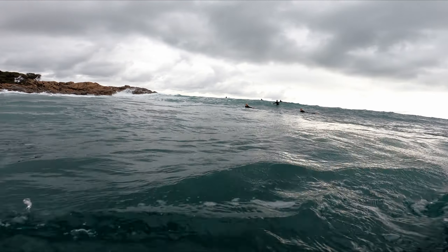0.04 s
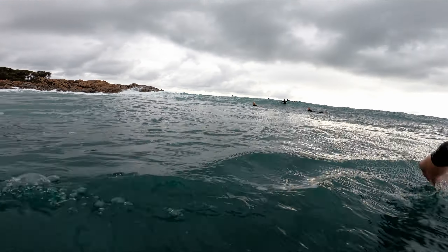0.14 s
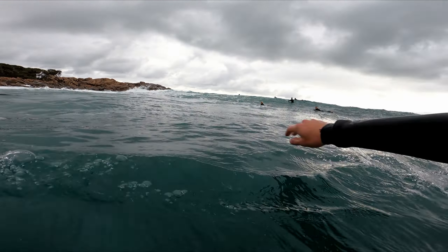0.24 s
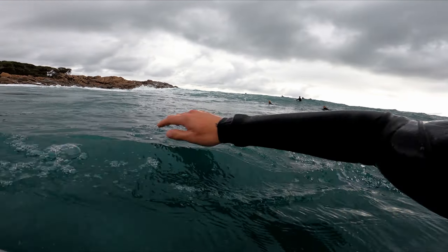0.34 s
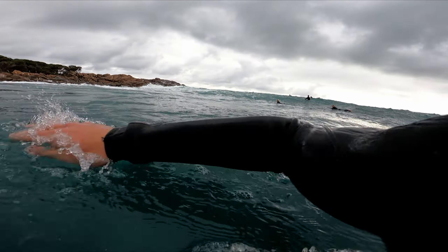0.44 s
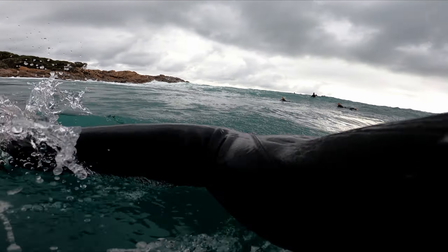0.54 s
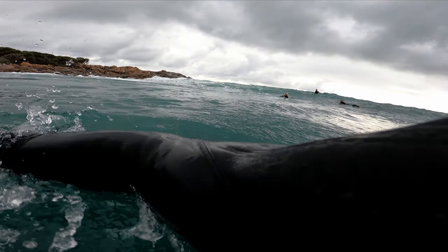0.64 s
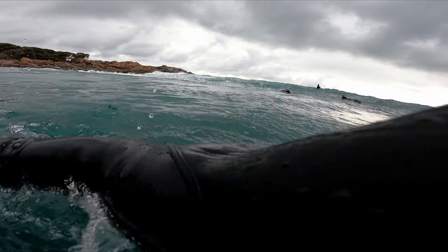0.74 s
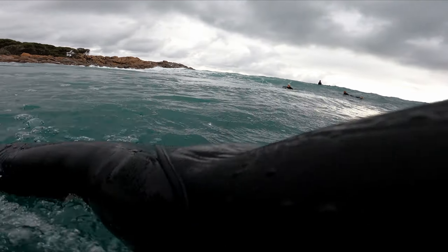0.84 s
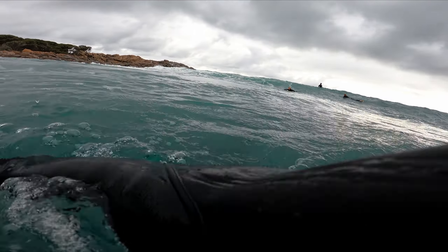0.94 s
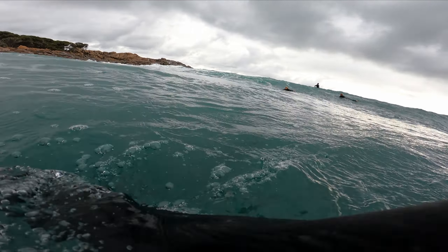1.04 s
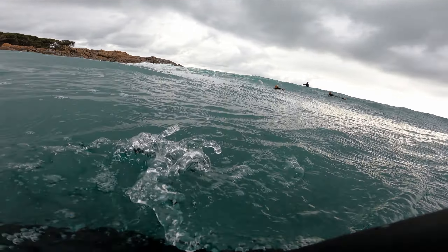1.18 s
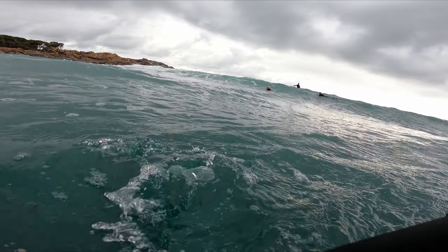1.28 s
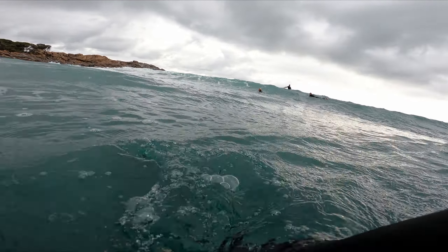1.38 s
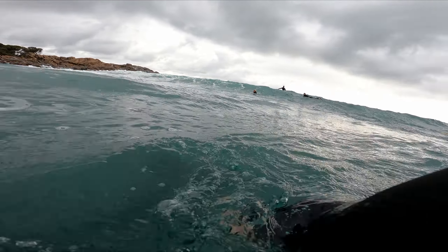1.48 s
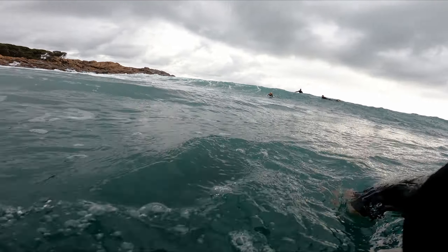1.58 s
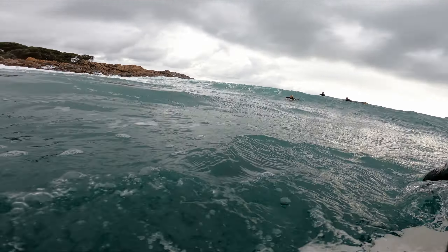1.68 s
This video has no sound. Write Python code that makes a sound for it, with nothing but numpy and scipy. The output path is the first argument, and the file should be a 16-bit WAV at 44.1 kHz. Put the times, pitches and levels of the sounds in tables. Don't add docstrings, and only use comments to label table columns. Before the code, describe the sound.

A small camera at choppy sea level: water gulps, knocks and sloshes against its covered microphone while spray hisses, drops tick, and wind rumbles low.

```python
import sys
import numpy as np
from scipy import signal
from scipy.fft import rfft, irfft, next_fast_len
from scipy.io import wavfile
from scipy.ndimage import uniform_filter1d, minimum_filter1d, map_coordinates

SR = 44100
rng = np.random.default_rng(int(sys.argv[2]) if len(sys.argv) > 2 else 0)


def convert_level_to_amplitude(level_db):
    exponent = np.asarray(level_db, float) / 20
    return 10 ** exponent


def unload_audio(sound):
    columns = np.transpose(np.atleast_2d(sound))
    steps = np.round(np.clip(columns, -1, 1) * 32767)
    wavfile.write(sys.argv[1], SR, steps.astype(np.int16))


N = 266805

# t/s, peak level/dB, f/Hz
SNAPS = [(0.167, -17.5, 1050), (0.204, -10.5, 1030), (0.226, -16, 1264), (0.252, -13.5, 1056),
         (0.59, -8.5, 1260), (0.74, -8.5, 1055), (0.786, -17.5, 1136), (0.82, -11.5, 1060),
         (.839, -12.5, 1050), (0.861, -8, 1213), (.885, -7.5, 1250), (0.9, -10.5, 1300), (0.601, -11, 1090),
         (2.044, -12, 1150), (2.133, -12.5, 1006), (2.147, -15.5, 950), (2.163, -16, 950),
         (2.178, -15, 1008), (2.562, -11.5, 1050), (2.628, -17.5, 1050), (3.645, -21, 1050),
         (4.206, -17, 950), (4.238, -22.5, 976), (4.636, -16.5, 1050), (0.951, -9, 1170),
         (0.9645, -7.5, 1180), (0.976, -7.5, 1190), (1.13, -14.5, 1120), (1.172, -10.5, 1160),
         (1.272, -13.5, 960), (1.303, -24, 1067), (1.418, -10, 1153), (1.456, -6.5, 1170),
         (1.546, -18, 940), (1.89, -10, 1050), (2.269, -17.5, 1070), (2.331, -19.5, 923),
         (2.526, -12.5, 1050), (2.67, -19, 873), (2.975, -12.5, 1048), (3.09, -18, 1110),
         (3.549, -14.5, 1120), (4.072, -11, 1095), (4.113, -21.5, 953), (4.19, -23, 920), (4.269, -18, 890),
         (4.297, -17, 1050), (4.323, -14.5, 1050), (4.34, -20.5, 897), (4.675, -12.5, 1110),
         (4.728, -15.5, 906), (4.777, -14.5, 873), (5.054, -20.5, 972), (5.273, -12, 1065),
         (5.705, -13, 1120)]
# t/s, graininess, sharpness/dB
COARSE = [(0, 0.34, -3.5), (.9, 0.56, 2), (1.3, 0.61, 0), (1.9, 0.77, -2), (2.3, 0.45, 0.5),
          (2.8, 0.36, -4), (3.5, 0.58, 1), (4.2, 0.53, -5.5), (4.9, 0.14, -3.5), (5.4, 0.32, -2),
          (6.05, 0.096, 1.5)]
# f/Hz, level/dB
CLEAR = [(100, -15), (300, 2), (800, -4), (1800, -7.5), (2600, -6), (3300, -2), (3850, 2.5), (4900, -6),
         (6300, -12), (7400, -21.5), (8400, -36), (9900, -55.5), (11800, -48.5), (13300, -61)]


def film():
    slosh_db, froth_db, rattle_db = stirring()
    tremble = wobble(140)
    pockets = air_pockets(tremble)
    ringing = filtered(pockets, lambda hz: hz > 650)

    churn = convert_level_to_amplitude(slosh_db + 4.0) * slosh() + (convert_level_to_amplitude(froth_db - 2.5) + convert_level_to_amplitude(-55)) * froth()
    churn = convert_level_to_amplitude(1.86 * wobble(25)) * pushed_aside(pockets - ringing, 2.1) * churn

    snap_s = np.transpose(SNAPS)[0]
    rattle_db = rattle_db - humps(snap_s - .001, rise=0.0084, fall=0.0026, db=6)
    unsteady_db = (0.94 + 2.4 * curves(COARSE)[0]) * wobble(40)
    shaking = convert_level_to_amplitude(rattle_db + 5.0 + unsteady_db) * pushed_aside(ringing, 14) * rattle()
    shaking = filtered(shaking, lambda hz: 1 / (1 + (hz / 2200) ** 8))
    return filtered(churn, wet_port) + shaking + pockets


def air_pockets(tremble):
    # t/s, start f/Hz, end f/Hz, length/s, peak level/dB
    gulps = [(.01, 125.7, 114.7, 0.014, -7), (0.051, 177.3, 132.5, 0.017, -10.5),
             (0.683, 902, 705, 0.031, -24.5), (0.834, 465, 312, 0.043, -18.5),
             (0.838, 230, 113.6, 0.095, -10.5), (.705, 957, 675, .025, -24.5),
             (1.003, 148, 133, 0.045, -16.5), (.15, 297, 216, 0.071, -23.5), (2.93, 350, 217, 0.019, -20),
             (4.2, 1028, 397, 0.021, -28), (4.64, 200, 149.5, 0.03, -11.5), (4.725, 297, 235, 0.016, -20),
             (5.035, 401, 190.4, 0.021, -15.5), (5.675, 288, 154, 0.049, -20),
             (0.611, 293, 255.4, 0.11, -24), (.955, 139.3, 169, 0.051, -14.5),
             (1.595, 289, 169, 0.069, -23.5), (2.02, 189.8, 149.7, 0.059, -13),
             (2.133, 184, 156, 0.016, -9.5), (2.174, 155, 154, 0.031, -12), (2.889, 485, 265, 0.04, -13.5),
             (4.139, 376, 1236, 0.032, -22.5), (3.722, 313, 164.3, .07, -17.5),
             (3.829, 251, 195, 0.025, -15), (4.005, 284, 200, 0.089, -19), (4.193, 264, 163, 0.046, -12.5),
             (4.273, 665, 388, 0.035, -22.5), (5.937, 78.6, 65.9, 0.056, -14)]
    # t/s, start f/Hz, end f/Hz, length/s, peak level/dB
    bloops = [(1.395, 433, 632, 0.019, -26), (1.492, 266, 650, 0.033, -16), (1.53, 222.6, 650, 0.036, -19),
              (1.857, 1546, 1695, 0.011, -12), (1.896, 1079, 1143, 0.036, -29.5),
              (3.733, 950, 1430, .025, -27.5), (3.745, 930, 990, .025, -30), (4.01, 955, 1100, 0.034, -34),
              (4.262, 385, 647, 0.02, -23), (5.305, 140, 265, 0.045, -17), (5.35, 864, 918, 0.02, -25.5),
              (1.933, 1920, 2070, 0.0091, -2), (2.806, 200, 217, 0.052, -14.5),
              (2.857, 273, 572, 0.031, -18.5), (3.189, 278.5, 357, 0.061, -18),
              (3.604, 163, 274, 0.034, -17.5), (3.651, 265.6, 312, 0.03, -14.5),
              (3.707, 845, 1020, .05, -25), (3.944, 164.2, 202.5, 0.14, -18),
              (4.113, 181, 1664, 0.04, -23.5), (4.36, 137.5, 169.4, 0.15, -21),
              (4.598, 185.5, 206, 0.028, -16.5), (4.818, 186, 184, 0.036, -16),
              (5.024, 240, 431, 0.022, -21.5), (5.088, 173, 199.4, 0.041, -16.5),
              (5.477, 177, 520, .06, -20.5), (5.568, 150.6, 187, 0.012, -12),
              (5.86, 174.6, 228, .045, -20.5)]
    # t/s, start f/Hz, end f/Hz, length/s, peak level/dB
    flutters = [
        (2.0397, 117.6, 110.5, 0.135, -25.5),
        (5.451, 146, 134, 0.26, -36.5),
    ]

    pockets = bubbles(*np.transpose(gulps), overtone=0.11, attack=0.2, settle=0.91)
    pockets = pockets + bubbles(*np.transpose(bloops), overtone=0.26, attack=0.082, settle=0.13)
    s, db, hz = np.transpose(SNAPS)
    pockets = pockets + bubbles(s, 1.415 * hz, hz, 1.7 / hz, db - 3.5, overtone=.3, attack=0.044)
    pockets = pockets + bubbles(s, 0.4 * hz, 0.7 * hz, 2.0 / hz, db - 13, overtone=0, attack=0.099)
    pockets = pockets * convert_level_to_amplitude(1.5 * tremble)

    flaps = -bubbles(*np.transpose(flutters), overtone=0.97, attack=0.24, count=16)
    flaps = coloured(flaps, [(200, 3.5), (500, -20.0), (1000, -13.0), (2200, 9.0)])
    buzzing = coloured(buzz(tremble), [(200, -0.5), (500, -14.0), (950, -7), (1300, -10.5), (2200, 2.5)])
    return filtered(pockets + flaps + buzzing, wet_port)


def buzz(tremble, overtone=0.91, rough=0.006, count=13):
    # t/s, f/Hz, level/dB
    beats = [
        (1.578, 425.2, -59.5),
        (1.586, 366.6, -22),
        (1.6, 286, -24),
        (1.63, 225.8, -26),
        (1.664, 176.5, -21.5),
        (1.698, 214.2, -23.5),
        (1.731, 167.7, -25),
        (1.748, 172, -56),
    ]
    hz, db = curves(beats)
    uneven_hz = uniform_filter1d(hz, size=600) * (1 + rough * tremble)
    turn = 2 * np.pi * np.cumsum(uneven_hz) / SR
    tone = sum(overtone ** n * np.sin((n + 1) * turn) for n in range(count))
    return -convert_level_to_amplitude(db + 40 * rough * tremble) * (db > -55) * tone


def slosh():
    # f/Hz, level/dB
    rush = [(70, -22), (125, -2.5), (180, -3.5), (280, -7), (380, -16), (600, -24.5)]
    flaps = swarm(count=420, mid_hz=200, spread=0.338, cycles=4.99, glide=0.377, scatter_db=0.0, overtone=0.28)
    return unit(0.48 * flaps + 0.83 * unit(coloured(patchy(3.45), rush)))


def froth():
    # f/Hz, level/dB
    fine = [(250, -16.5), (400, -1), (650, -10.5), (1000, -29)]
    beads = swarm(count=700, mid_hz=520, spread=.22, cycles=5.3, glide=.3, scatter_db=3.5, overtone=0)
    return unit(0.66 * beads + 0.89 * unit(coloured(patchy(0.81), fine)))


def rattle():
    # f/Hz, level/dB
    shake = [(400, -39), (750, -22), (950, 7), (1400, 9), (3000, 2.5), (6000, -10), (9000, -30)]
    # t/s, ring f/Hz
    ring = [(0.0, 1038), (0.74, 1050), (1.14, 1120), (1.68, 1003), (1.94, 1158), (2.19, 980), (2.24, 1073),
            (2.81, 1028), (2.85, 1093), (3.2, 1040), (4.87, 1027), (5.15, 1176), (5.37, 882), (5.41, 1093),
            (5.59, 993), (5.68, 1150), (5.9, 1103), (6.05, 1174)]
    low_hz, high_hz = 950, 1170
    patter = swarm(count=1800, mid_hz=1050, spread=0.27, cycles=8.8, glide=0.19, scatter_db=-3.0, overtone=0)
    hiss = coloured(patchy(2.8, bins=2.6, frames=2.8), shake)
    shaken = 0.65 * patter + 3.4 * unit(hiss)
    low_ring = unit(filtered(shaken, lambda hz: wet_port(hz, low_hz, sharp=2.19)))
    high_ring = unit(filtered(shaken, lambda hz: wet_port(hz, high_hz, sharp=2.19)))
    high = np.clip((curves(ring)[0] - low_hz) / (high_hz - low_hz), 0, 1)
    return unit((1 - high) * low_ring + high * high_ring)


def wet_port(hz, ring_hz=1060, sharp=2.4):
    return (1 - (hz / ring_hz) ** 2 + 1j * hz / (ring_hz * sharp)) ** -2


def stirring():
    # t/s, level/dB
    stir = [(0, -32), (.8, -30.5), (1.1, -32.5), (1.5, -29), (2, -29), (2.15, -26.5), (2.35, -31),
            (2.68, -30.5), (2.86, -21.5), (3.05, -33.5), (3.3, -27.5), (3.5, -30.5), (3.72, -21.5),
            (3.9, -27.5), (4.3, -27.5), (4.8, -29), (6.05, -28)]
    # t/s, fade/s, churn level/dB, rattle level/dB
    surges = [(.02, 0.038, 8.5, 0), (.17, 0.1, 4.5, -1.5), (0.697, 0.057, -1, 10.5), (0.82, 0.054, 4.5, 6),
              (.88, 0.044, 1.5, 7.5), (.93, 0.046, 6, 3.5), (.98, 0.016, 2.5, 1.5), (1.041, 0.036, 3, 2.5),
              (1.32, 0.098, -7, 4), (1.59, 0.043, 8, 6), (1.67, 0.12, -5, -5), (1.79, 0.049, -2.5, -5.5),
              (2.28, .04, -10.5, 4), (3.19, 0.04, -2, 9.5), (3.47, 0.031, -5, 4), (4.93, 0.13, -4, 3.5),
              (5.66, 0.29, -4, -0.5), (2.63, 0.05, 5, 2.5), (2.02, 0.039, 5, 2.5), (2.09, 0.18, 2, 3),
              (2.9, 0.036, 7.5, 12), (3.224, 0.045, 8.5, -0.5), (3.331, 0.082, 10, 1.5),
              (3.57, 0.16, 7.5, 2), (3.74, 0.018, -7.5, 4), (4.031, 0.04, 3, 7), (4.13, 0.038, 2, 7.5),
              (4.16, 0.025, -6, 10), (4.461, 0.15, 2.5, -5), (4.6, 0.024, -0.5, 3.5),
              (4.649, 0.021, 8, 1.5), (5.9, 0.11, -2, 0), (5.09, 0.023, 9, -6.5), (5.34, 0.06, 5, 3),
              (5.483, 0.13, 8.5, 7)]
    # t/s, settling/s, return/s, depth/dB
    lulls = [(1.009, 0.036, 0.025, 12), (1.576, 0.18, 0.023, 10), (2.07, 0.016, 0.087, 3),
             (2.199, 0.019, 0.12, 16), (2.929, 0.032, 0.055, 14), (2.999, 0.071, 0.18, 20.5),
             (3.37, 0.056, 0.029, 8.5), (3.522, 0.038, 0.081, 11), (3.84, 0.089, 0.18, 12),
             (4.082, 0.026, 0.04, 17.5), (4.18, 0.018, 0.0095, 27), (4.38, 0.11, .08, 6),
             (.23, 0.022, 0.05, 2.5)]
    stir_db = curves(stir)[0]
    above_calm_db = stir_db + 26.5
    s, fade, churn_db, ring_db = np.transpose(surges)
    slap_s = 0.051
    churn = humps(s, slap_s, fade, churn_db)
    ring = humps(s, slap_s, fade, ring_db)
    still = humps(*np.transpose(lulls))
    slosh_db = stir_db + churn - 0.7 * still
    froth_db = -34 + 0.13 * above_calm_db + churn - 0.93 * still
    rattle_db = -28 + 0.69 * above_calm_db + ring - still
    return slosh_db, froth_db, rattle_db


def spray():
    grain, sharp_db = curves(COARSE)
    hiss = fizz(grain)
    pings = drops(hiss)
    level = convert_level_to_amplitude(foaming() + 6.0) * pushed_aside(pings, 2.0)
    return level * foam(hiss, grain, sharp_db) + pings + ticks()


def fizz(grain):
    keep = np.exp(-1 / (0.0043 * SR))
    bursts = unit(signal.lfilter([1], [1, -keep], convert_level_to_amplitude(4.85 * grain * wobble(260))))
    return bursts * patchy(2.1, bins=10, frames=3)


def foam(hiss, grain, sharp_db):
    crackle = swarm(count=1500, mid_hz=3700, spread=0.24, cycles=5.8, glide=0.2, scatter_db=3.0, overtone=0)
    spatter = swarm(count=700, mid_hz=6460, spread=0.15, cycles=2.9, glide=0.089, scatter_db=1.5, overtone=0.3)
    clumps = convert_level_to_amplitude(1.8 * wobble(21.62))
    mix = coloured(hiss + grain * clumps * (0.53 * crackle + 0.36 * spatter), CLEAR)
    mix = mix / np.sqrt(np.abs(uniform_filter1d(mix ** 2, SR // 4)))
    top = filtered(mix, lambda hz: 1 / (1 + (5200 / (hz + 1)) ** 8))
    return mix + (convert_level_to_amplitude(sharp_db) - 1) * top


def drops(hiss):
    # t/s, peak level/dB, f/Hz
    bursting = [(0.122, -26, 3780), (0.153, -20.5, 3470), (0.2294, -25, 3370), (0.302, -16, 2980),
                (0.3087, -25, 3570), (0.366, -14.5, 3590), (0.3719, -16, 3690), (0.3935, -20, 3720),
                (0.434, -20, 4250), (0.4832, -24, 3550), (0.5477, -33, 3500), (0.566, -29, 3950),
                (0.5782, -29, 3680), (0.6337, -34.5, 3760), (0.673, -21, 3970), (0.737, -20, 4530),
                (0.787, -28.5, 3150), (0.81, -20.5, 4860), (0.817, -28, 3040), (1.105, -28.5, 3530),
                (1.1258, -26, 3370), (1.2028, -19, 4270), (1.2084, -22, 4100), (1.338, -19, 4090),
                (1.3583, -22.5, 3800), (1.3832, -19.5, 3950), (1.4375, -18.5, 4090), (1.501, -29, 4000),
                (1.5318, -28, 4140), (1.786, -26.5, 3030), (1.853, -25, 3960), (1.875, -23.5, 3960),
                (1.924, -20.5, 4330), (1.935, -24.5, 4220), (1.968, -29, 4070), (1.9823, -18.5, 3800),
                (2.059, -25, 4000), (2.2633, -23.5, 3750), (2.323, -22, 2710), (2.397, -17.5, 3890),
                (2.4388, -17, 3930), (2.452, -14, 4190), (2.555, -19.5, 4140), (2.593, -22, 4190),
                (2.61, -21, 3400), (2.695, -33, 4150), (2.7488, -24, 3450), (2.815, -31.5, 4070),
                (3.002, -31.5, 3890), (3.027, -28, 4180), (3.058, -28, 3920), (3.0945, -23, 3740),
                (3.1392, -22.5, 3740), (3.649, -22.5, 4070), (3.933, -25, 3630), (4.3818, -26.5, 3920),
                (4.484, -15.5, 4160), (4.7788, -21.5, 4100), (4.8317, -23.5, 4210), (5.154, -22, 3700)]
    s, db, hz = np.transpose(bursting)
    pings = bubbles(s, hz, 1.037 * hz, 16 / hz, db + 0.5, overtone=0, attack=0.06)
    return filtered(pings * (1 + 1.3 * hiss), lambda f: 1 / (1 + (f / 6000) ** 14))


def ticks():
    # t/s, peak level/dB
    hits = [(0.201, -46), (0.295, -41), (0.4374, -26), (0.6685, -36), (0.7156, -32.5), (0.7384, -34),
            (0.8784, -38), (0.896, -34), (1.146, -37), (1.226, -36), (1.2382, -28), (1.4448, -29),
            (1.717, -50.5), (1.856, -28), (1.8781, -34.5), (1.925, -30.5), (1.9994, -35), (2.0596, -45.5),
            (2.2621, -27.5), (2.2963, -30), (2.3496, -28.5), (2.379, -44), (2.4046, -25.5), (2.4368, -37.5),
            (2.4433, -28.5), (2.808, -40), (3.093, -38), (3.5252, -32.5), (3.5376, -29), (3.93, -37),
            (4.3793, -43), (4.4787, -47), (4.776, -34.5), (5.2062, -42), (5.2167, -30), (5.8494, -40)]
    s, db = np.transpose(hits)
    strikes = np.zeros(N)
    strikes[np.round((s + .001) * SR).astype(int)] = convert_level_to_amplitude(db + 21.0)
    fade = convert_level_to_amplitude(-60 * np.arange(400) / SR / 0.012)
    noise = np.convolve(strikes, fade)[:N] * rng.standard_normal(N)
    return coloured(coloured(noise, CLEAR), [(2000, -23.5), (6000, 6), (7200, 5), (9000, -1.5), (11500, 7)])


def foaming():
    # t/s, level/dB
    foam_level = [(0, -45.5), (.12, -40.5), (.3, -34), (.55, -41.5), (.94, -43.5), (1.25, -41.5),
                  (1.45, -39.5), (1.5, -48.5), (1.75, -50.5), (2.0, -36.5), (2.4, -38), (2.75, -38),
                  (3.12, -39.5), (3.45, -45), (4.0, -45), (4.45, -36.5), (4.86, -32), (6.05, -30)]
    # t/s, fade/s, level/dB
    splashes = [(.37, 0.013, 2), (0.569, 0.13, 8), (.74, 0.19, 7.5), (1.247, 0.04, 11), (1.79, 0.14, 6.5),
                (2.458, 0.0053, 6), (3.15, 0.06, -0.5), (3.544, 0.037, 14.5), (3.939, 0.094, 10),
                (4.482, 0.035, 6), (4.58, 0.069, 5)]
    # t/s, sinking/s, clearing/s, depth/dB
    dunks = [(.215, 0.024, 0.015, 7.5), (0.961, 0.016, 0.13, 12), (2.22, 0.29, 0.044, 16),
             (2.95, 0.18, 0.17, 21.5), (3.22, 0.047, 0.05, 12.5), (3.33, 0.066, 0.15, 13),
             (3.721, 0.063, 0.13, 15), (4.16, 0.043, 0.37, 14), (4.621, 0.052, 0.077, 10.5),
             (4.749, 0.055, 0.078, 7.5), (5.14, 0.17, 0.011, 8), (5.324, 0.02, 0.16, 13),
             (5.53, 0.052, 0.069, 11.5)]
    s, fade, db = np.transpose(splashes)
    jumps = humps(s, 0.042, fade, db)
    return curves(foam_level)[0] + jumps - humps(*np.transpose(dunks))


def seep():
    hiss = coloured(patchy(3.7), CLEAR)
    hiss = coloured(hiss, [(300, -3.5), (2000, 9.5), (6300, -4.0), (7500, -36.0), (9000, -52.5)])
    return convert_level_to_amplitude(foaming() - 11.0) * unit(hiss)


def buffet():
    # t/s, level/dB
    gusts = [(0, -28), (1.28, -28), (1.51, -30), (1.67, -20.5), (1.84, -30), (1.92, -26), (3.33, -25),
             (3.44, -23.5), (3.49, -25.5), (4.08, -30.5), (4.18, -20.5), (4.52, -20), (4.6, -38.5),
             (4.72, -27), (6.05, -22)]
    # f/Hz, level/dB
    rumble = [(12, -14.5), (25, 14), (45, 10.5), (90, 7.5), (140, -2.5), (300, -90.5)]
    return convert_level_to_amplitude(curves(gusts)[0] + 2.0) * unit(coloured(patchy(0.93), rumble))


def bubbles(s, start_hz, end_hz, life, db, overtone, attack, count=3, settle=1):
    k = np.arange(int(np.max(life) * SR) + 1)
    u = np.clip(k / SR / life[:, None], 0, 1)
    path = settle * (u ** 2 - u ** 3 / 3) + (1 - settle) * u ** 2 / 2
    cycles = life[:, None] * (start_hz[:, None] * u + (end_hz - start_hz)[:, None] * path)
    turn = 2 * np.pi * cycles
    shape = np.minimum(u / attack, 1) * np.cos(np.pi / 2 * u) ** 0.94
    tone = sum(overtone ** n * np.sin((n + 1) * turn) for n in range(count if overtone else 1))
    at = np.round(s * SR).astype(int)[:, None] + k
    return np.bincount(at.ravel(), (convert_level_to_amplitude(db)[:, None] * shape * tone).ravel(), N + len(k))[:N]


def swarm(count, mid_hz, spread, cycles, glide, scatter_db, overtone):
    u, g = rng.random((count, 2)), rng.standard_normal((count, 2))
    s = u[:, 0] * N / SR
    hz = mid_hz * np.exp(np.clip(spread * g[:, 0], -.5, 1))
    end_hz = hz * np.exp(glide * g[:, 1])
    size_db = -scatter_db * np.log(u[:, 1] + 0.0017)
    return unit(bubbles(s, hz, end_hz, cycles / hz, size_db, overtone, attack=0.17))


def patchy(depth_db, bins=6, frames=8):
    z = signal.stft(rng.standard_normal(N), nperseg=256)[2]
    field = uniform_filter1d(rng.standard_normal(z.shape), int(bins), 0)
    field = uniform_filter1d(field, int(frames), 1)
    return unit(signal.istft(z * convert_level_to_amplitude(depth_db * unit(field)), nperseg=256)[1][:N])


def wobble(rate):
    return map_coordinates(rng.standard_normal(int(N * rate / SR) + 4), [np.arange(N) * rate / SR])


def pushed_aside(x, strength):
    return 1 / (1 + strength * uniform_filter1d(np.abs(x), 441))


def humps(s, rise, fall, db):
    t = np.arange(0, N, 16) / SR
    total = np.zeros(len(t))
    for at, up, down, peak in np.broadcast(s, rise, fall, db):
        total += np.interp(t, [at - abs(up), at, at + abs(down)], [0, peak, 0])
    return np.interp(np.arange(N) / SR, t, total)


def curves(rows):
    s, *cols = np.transpose(rows)
    return [np.interp(np.arange(N) / SR, s, c) for c in cols]


def along(points, hz):
    f, v = np.transpose(points)
    return np.interp(np.log(hz + 1), np.log(f + 1), v)


def filtered(x, response):
    m = next_fast_len(N + 8192)
    return irfft(rfft(x, m) * response(np.fft.rfftfreq(m, 1 / SR)), m)[:N]


def coloured(x, points):
    return filtered(x, lambda hz: convert_level_to_amplitude(along(points, hz)))


def unit(x):
    return x / np.sqrt(np.mean(x ** 2) + 1e-20)


def scene():
    # f/Hz, level/dB
    through = [(20, -6.5), (110, -6), (200, -9), (600, -14), (1200, -23), (3000, -30)]
    # f/Hz, level/dB
    to_left = [(100, -28.5), (160, -12), (600, -10), (1200, -14), (4700, 11.5), (5000, -46)]
    to_right = [(100, -25), (200, -35), (1800, 1.5), (2700, -3.5), (3900, -10.5), (4600, -19.5),
                (5000, -57)]
    water = film()
    low_water = filtered(water, lambda hz: (hz > 100) * (hz < 400))
    wet = water + pushed_aside(low_water, 3) * convert_level_to_amplitude(1.5) * buffet()
    clear = spray() + convert_level_to_amplitude(-15) * coloured(buffet(), [(20, 0), (70, -2), (150, 14)])
    left = clear + filtered(wet, lambda hz: convert_level_to_amplitude(along(through, hz)) + 1j * convert_level_to_amplitude(along(to_left, hz)))
    right = wet + seep() + filtered(clear, lambda hz: 1j * convert_level_to_amplitude(along(to_right, hz)))
    return np.array([left, right])


def band_limit(x):
    return signal.sosfilt(signal.butter(12, 13200, fs=SR, output="sos"), x)


def record(dry):
    needed = np.minimum(1, .72 / (np.abs(dry).max(axis=0) + 1e-9))
    gain = minimum_filter1d(needed, size=900)
    gain = uniform_filter1d(uniform_filter1d(gain, size=300), size=300)
    gain = gain * signal.windows.tukey(N, .0004)
    hiss = convert_level_to_amplitude(-127) * rng.standard_normal(dry.shape)
    return band_limit(gain * dry + hiss)


dry = scene()
out = record(dry)
unload_audio(out)
```